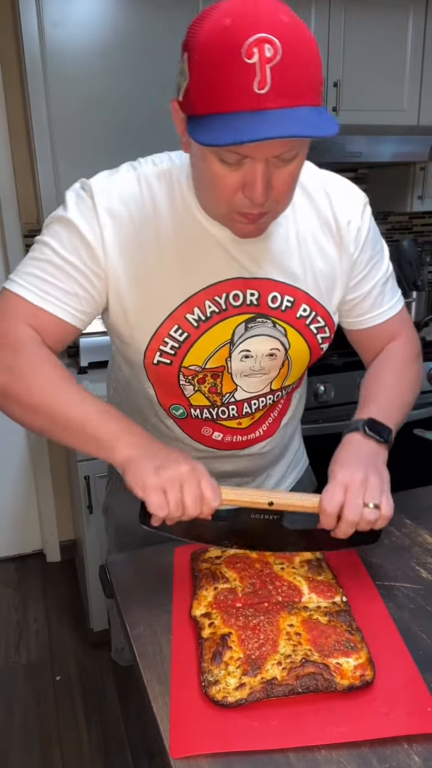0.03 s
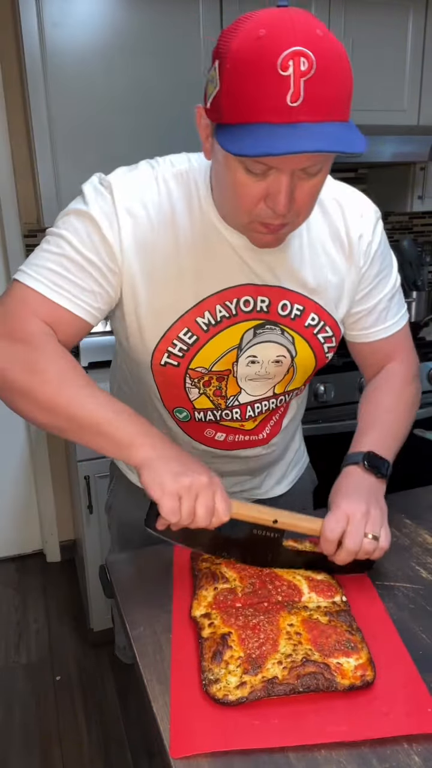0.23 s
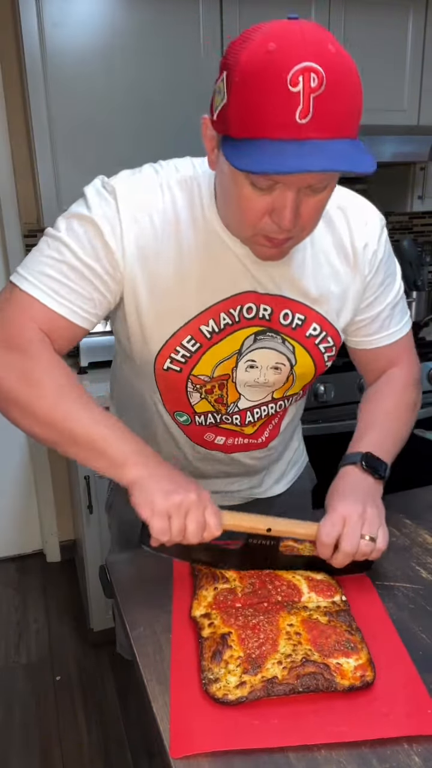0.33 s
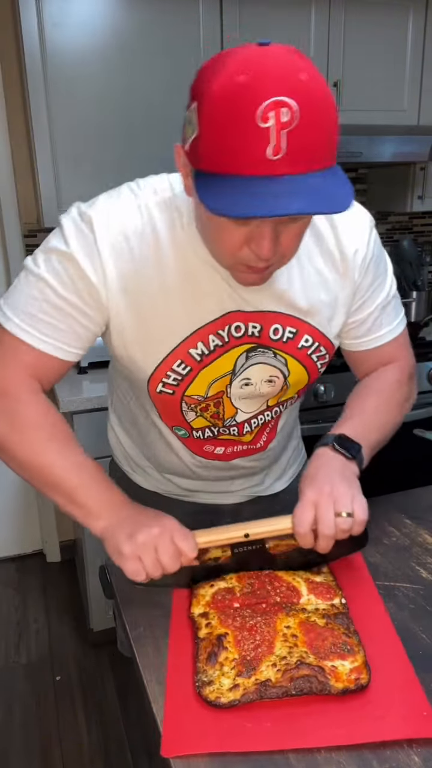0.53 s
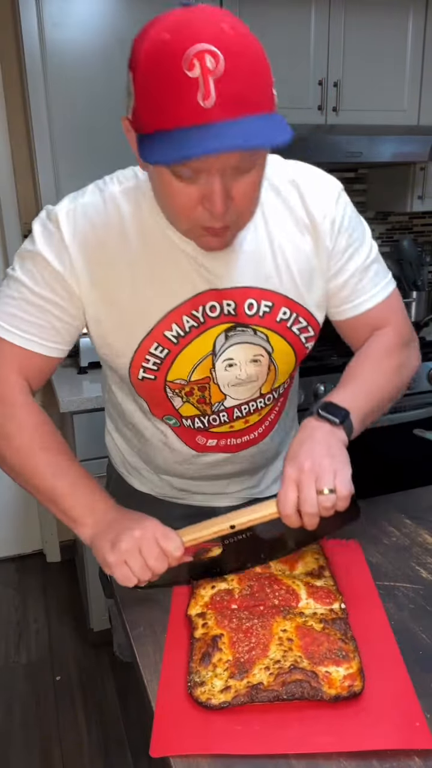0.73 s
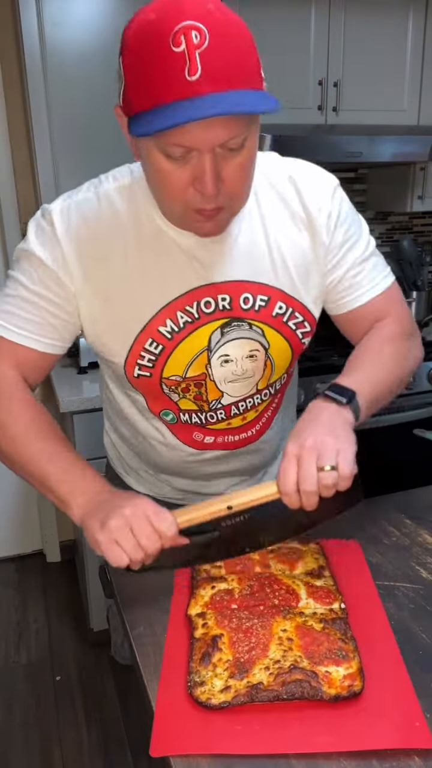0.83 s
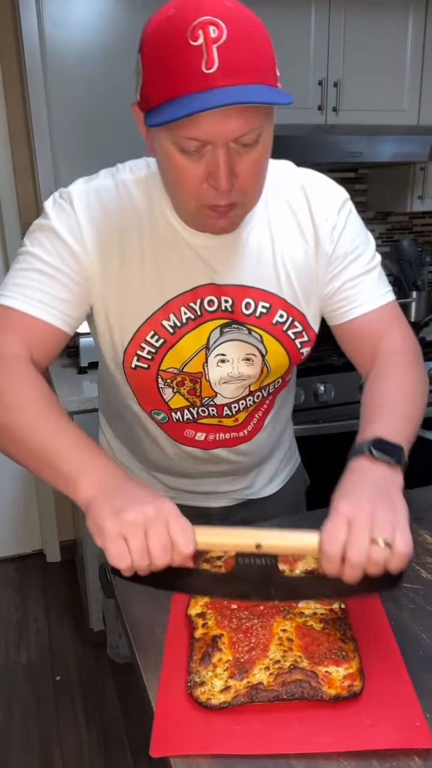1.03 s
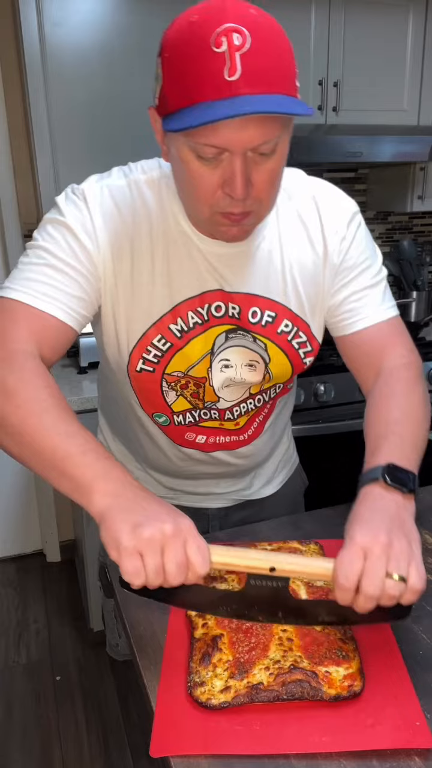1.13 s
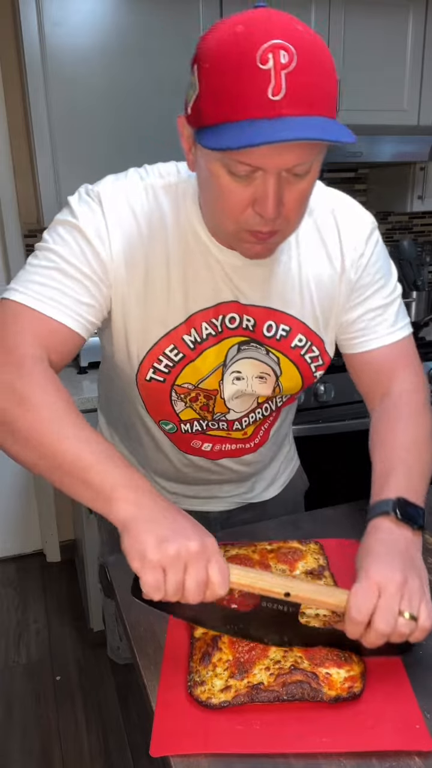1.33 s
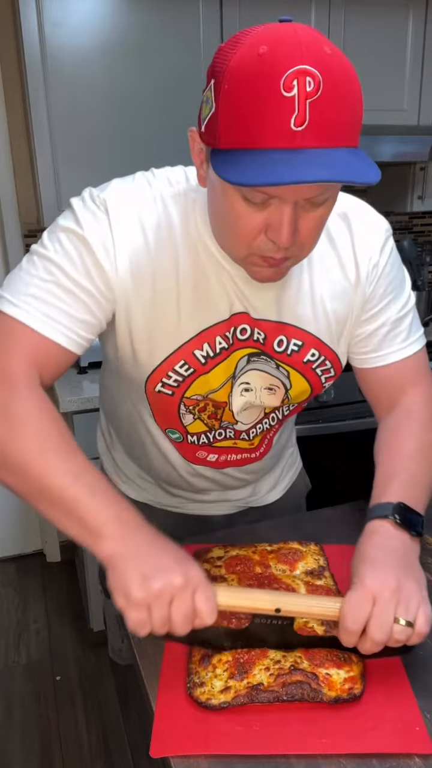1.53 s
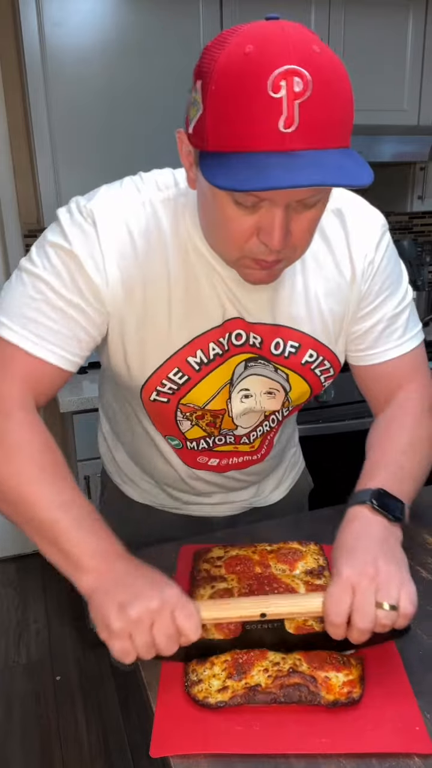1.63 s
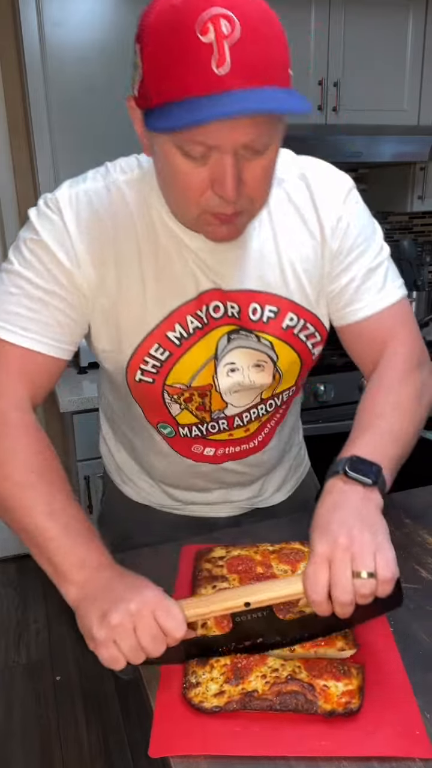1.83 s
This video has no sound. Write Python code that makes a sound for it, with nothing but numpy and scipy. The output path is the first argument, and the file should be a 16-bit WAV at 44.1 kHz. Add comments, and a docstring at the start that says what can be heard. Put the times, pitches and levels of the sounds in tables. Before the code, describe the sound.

A rocker knife crunches twice through crisp baked pizza crust, knocking on a board in a kitchen

```python
"""A steel rocker knife cuts a crisp pizza twice, on a board in a home kitchen where an appliance hums.
In the first cut the blade bites the crust, knocks onto the board, then rocks through: fracture grains
crackle, flakes snap as brief pings, and damped modes make the board groan and the blade ring faintly.
The blade then slides out with a faint swell of resonant noise. The second cut bites, knocks, crackles
and groans likewise, without the swell; a short low bump, one decaying cosine, falls near its end."""
import sys
import numpy as np
from scipy import signal
from scipy.fft import rfft, irfft, next_fast_len
from scipy.io import wavfile
from scipy.ndimage import map_coordinates

SR = 44100
rng = np.random.default_rng(int(sys.argv[2]) if len(sys.argv) > 2 else 0)


def wav_out(sig):
    """Save sig, one row per channel (or a flat mono array), as 16-bit PCM at SR to the path in sys.argv[1]."""
    wavfile.write(sys.argv[1], SR, np.round(np.clip(np.atleast_2d(sig).T, -1, 1) * 32767).astype(np.int16))


N = 83790  # length in samples

# modes of board and counter: [f/Hz, relative level/dB, t60/s]
BOARD_MODES = [(149.6, -15.5, 0.44), (178.7, -8.5, 0.15), (296, -10.5, 0.44), (325.2, -5.5, 0.26),
               (352.5, -10.5, 0.25), (423.6, -6.5, 0.26), (474.6, -6.5, 0.13), (506.7, -5, 0.15),
               (646, -10, 0.14), (691, -10, 0.3), (756, -11, 0.35), (977, -11, 0.066)]


def amp(db):
    """Amplitude ratio of a level in decibels."""
    return 10 ** (np.asarray(db) / 20)


def unit(x):
    """Normalization to rms 1, so that a level set afterwards is an rms level."""
    return x / np.sqrt(np.mean(x ** 2) + 1e-20)


def along(points, hz):
    """Interpolation of (f/Hz, value) points on a logarithmic frequency axis."""
    f, value = np.transpose(points)
    return np.interp(np.log(hz + 1), np.log(f + 1), value)


def filtered(x, response):
    """Linear filtering: the spectrum of x times a response of frequency."""
    length = next_fast_len(N + SR // 2)
    hz = np.fft.rfftfreq(length, 1 / SR)
    return irfft(rfft(x, length) * response(hz), length)[..., :N]


def coloured(x, spectrum):
    """Spectral shaping of x by (f/Hz, level/dB) points, normalized to rms 1."""
    return unit(filtered(x, lambda hz: amp(along(spectrum, hz))))


def since(s):
    """Elapsed time in seconds since the moment s, zero before it."""
    return np.maximum(np.arange(N) / SR - s, 0)


def dying(t, t60):
    """Exponential decay, by 60 dB in t60 seconds, that starts when t does."""
    return amp(-60 * t / t60) * (t > 0)


def ring(modes, t):
    """Modal superposition: damped sinusoids of alternating sign."""
    out = 0
    for k, (hz, db, t60) in enumerate(modes):
        out = out + (-1) ** k * amp(db) * dying(t, t60) * np.sin(2 * np.pi * hz * t)
    return out


def rung(x, modes):
    """Forced vibration: x convolved with a body's modal response, as strong as x."""
    return np.std(x) * unit(signal.fftconvolve(x, ring(modes, since(0)))[:N])


def grains(rate, spread_db):
    """Random impulses of either sign: tiny fractures, a few much larger than the rest."""
    size_db = spread_db * np.minimum(rng.exponential(size=N), 5)
    broken = rng.random(N) < rate / SR
    return broken * amp(size_db) * rng.choice([-1, 1], N)


def wobble(rate):
    """Random modulation: a smooth curve through rate random knots a second."""
    knots = rng.standard_normal(int(N * rate / SR) + 4)
    return map_coordinates(knots, [np.arange(N) * rate / SR])


def kitchen(x, wet_db, scatter_t60):
    """Impulse response in sum and difference: direct sound, scatter off the counter, reverberation."""
    # decay of the room: [f/Hz, t60/s]
    room_decay = [(100, 0.87), (500, 0.2), (2200, .5), (6000, 0.32), (12000, 0.18)]
    noise = rng.standard_normal((2, SR // 2))
    hz, t, bands = signal.stft(noise, SR, nperseg=256)
    fading = amp(-60 * t / along(room_decay, hz)[:, None])
    tail = signal.istft(bands * fading, SR, nperseg=256)[1]
    response = amp(wet_db) * tail / np.linalg.norm(tail[0])
    response[0, 0] += 1  # direct sound, in the sum only
    tail_t = np.arange(tail.shape[1]) / SR
    scatter = rng.standard_normal(tail.shape[1]) * dying(tail_t, scatter_t60)
    response[1] += scatter / np.linalg.norm(scatter)
    return signal.fftconvolve(x[None], response, axes=1)[:, :N]


def appliance():
    """Steady-state radiation: a hum of fixed partials over the broadband rush of the room."""
    # partials of the hum: [f/Hz, rms level/dB]
    partials = [(53.9, -56.5), (274, -64), (329.5, -62), (651.4, -68), (710.6, -72), (532.9, -75.5)]
    # colour of the rush: [f/Hz, relative level/dB]
    air_colour = [(25, -19), (45, 1.5), (200, -2), (450, -10), (700, -14), (1000, -22.5), (2000, -29.5),
                  (3200, -44.5), (6300, -37), (13000, -48.5)]
    air_db = -54.5
    hum = 0
    for hz, db in partials:
        cycles = hz * since(0) + rng.random()
        hum = hum + amp(db) * np.sqrt(2) * np.sin(2 * np.pi * cycles)
    rush = amp(air_db) * coloured(rng.standard_normal((2, N)), air_colour)
    return rush + hum * np.array([[1], [0]])  # hum in the sum channel only


def crust():
    """Brittle fracture under the rocking blade: grains crackle, shake the board and ring the steel."""
    # the two cuts: [t/s, fine crackle level/dB, coarse crunch level/dB, board's groan level/dB]
    cuts = [
        [(.152, -76, -79.5, -88), (.16, -54, -62.5, -47.5), (.188, -44, -46, -49), (.207, -44, -44.5, -32.5),
         (.275, -52, -45.5, -51), (.36, -56.5, -63, -45), (.368, -47, -42.5, -47), (.392, -38.5, -40, -40),
         (.403, -41, -35, -31), (.485, -40, -42.5, -38), (.53, -55, -48, -42), (.552, -43, -42.5, -43.5),
         (.62, -68, -66, -60), (.755, -74, -70, -56), (.772, -61, -55.5, -60), (.85, -75, -69, -74)],
        [(1.215, -85, -93, -83), (1.235, -64.5, -80, -72), (1.318, -54, -52.5, -67), (1.327, -37.5, -57, -51),
         (1.355, -61, -44, -35), (1.445, -56.5, -62, -45.5), (1.492, -43.5, -44, -43), (1.565, -31, -32.5, -27),
         (1.6, -40, -36, -32.5), (1.635, -36.5, -41, -34), (1.685, -58.5, -63, -48),
         (1.732, -46.5, -47.5, -37.5), (1.785, -66, -71, -59), (1.895, -76, -83, -73)],
    ]
    # tilt of the groan in dB per octave: the far cut groans deeper than the near one
    groan_tilts_db = [-1.6, 2.5]
    # colours of the three layers: [f/Hz, relative level/dB]
    crackle_colour = [(1500, 1.5), (2800, -3), (4000, -0.5), (5800, 1), (7500, -3), (9200, -1.5),
                      (11500, -3.5), (12300, -9), (15500, -24)]
    crunch_colour = [(500, -44), (950, 8.5), (1550, 3.5), (2050, 6), (2600, 0.5), (3600, -6), (6000, -41)]
    groan_colour = [(31, -34.5), (41, -8), (82, 2.5), (120, -11.5), (165, -2.5), (230, -12.5), (305, 4.5),
                    (390, -4), (510, 4.5), (610, -5.5), (710, 0), (850, -16.5), (1500, -45)]
    # modes of the blade: [f/Hz, relative level/dB, t60/s]
    blade_modes = [(1221, -0.5, 0.16), (1956, -10, 0.2), (2165, 1, 0.22), (2205, -3.5, 0.31),
                   (2700, 6, 0.31), (2717, -10, 0.49)]
    crackle_rate, crunch_rate = 2700, 1500  # fractures a second
    crackle_spread_db, crunch_spread_db = 2.5, 2.2
    spurt_rate, spurt_db = 110, 1.5  # the crust gives way in spurts: knots a second, depth
    blade_db, board_db = -12, -18  # blade's ring against the crunch, board's against the groan
    t, out = since(0), 0
    for cut, tilt_db in zip(cuts, groan_tilts_db):
        s, *levels = np.transpose(cut)
        spurts = spurt_db * wobble(spurt_rate)
        fine, coarse, low = [amp(np.interp(t, s, db, left=-120, right=-120) + spurts) for db in levels]
        crackle = fine * coloured(grains(crackle_rate, crackle_spread_db), crackle_colour)
        # crunch and groan share the same fractures
        breaks = grains(crunch_rate, crunch_spread_db)
        crunch = coarse * coloured(breaks, crunch_colour)
        tilted = [(hz, db + tilt_db * np.log2(hz)) for hz, db in groan_colour]
        groan = low * coloured(breaks, tilted)
        blade = amp(blade_db) * rung(crunch, blade_modes)
        board = amp(board_db) * rung(groan, BOARD_MODES)
        out = out + kitchen(crackle + crunch + groan + blade + board, wet_db=-6, scatter_t60=0.055)
    return out


def snaps():
    """Impulsive release as larger flakes break: a ping of a few cycles inside a wider, short crack."""
    # single flakes: [t/s, level/dB, f/Hz]
    flakes = [(0.1942, -20, 6700), (.2022, -21.5, 8500), (.2027, -22, 3500), (.278, -32, 9200),
              (.2894, -31, 10100), (0.4778, -19.5, 5600), (.5412, -19.5, 4300), (0.543, -25, 8300),
              (.649, -29, 4700), (0.765, -43.5, 4730), (0.7742, -35.5, 9700), (.792, -44, 6350),
              (1.227, -39.5, 6200), (1.2959, -31, 6300), (1.3249, -29, 4900), (1.332, -38, 5660),
              (1.339, -29, 6050), (1.404, -39, 8650), (1.651, -22.5, 6050), (1.7047, -18, 5830)]
    ping_db, ping_t60 = 1, 0.0027  # level against the flake's, decay in s
    crack_db, crack_t60, crack_octaves = -8.5, 0.0067, 0.68  # the same, then width of its band
    out = 0
    for s, db, pitch_hz in flakes:
        t = since(s)
        ping = amp(ping_db) * dying(t, ping_t60) * np.sin(2 * np.pi * pitch_hz * t)
        band = lambda hz: np.exp(-(np.log2((hz + 1) / pitch_hz) / crack_octaves) ** 2)
        noise = unit(filtered(rng.standard_normal(N), band))
        crack = amp(crack_db) * noise * dying(t, crack_t60)
        out = out + amp(db) * (ping + crack)
    return kitchen(out, wet_db=-8.5, scatter_t60=0.0067)


def knocks():
    """Impact excitation: the blade splits the bottom crust and clacks; board and counter ring on."""
    # contacts: [t/s, level of clack and ring/dB, f of the clack/Hz, dull thud level/dB, split level/dB]
    contacts = [(0.202, -15.5, 715, -13.5, -26), (.4, -25, 487, -28, -36),
                (0.6485, -48.5, 687, -44.5, -44.5), (1.3396, -18, 668, -30, -37),
                (1.624, -33, 720, -33, -44), (1.87, -47, 590, -42, -60)]
    # colours of thud and splitting crust: [f/Hz, relative level/dB]
    thud_colour = [(30, -26), (80, -6.5), (200, 2.5), (700, 2.5), (1100, -7.5), (3000, -64)]
    split_colour = [(600, -5), (2000, -2.5), (3600, -7), (5500, -14.5), (10000, -35), (14000, -55)]
    clack_db, clack_t60 = 4.5, 0.053  # level against the contact's, decay in s
    board_db = -1  # likewise against the contact's level
    thud_t60, thud_attack_s = 0.27, 0.0013
    split_rate, split_t60 = 7000, 0.16  # fractures a second as the bottom crust gives, decay in s
    cutoff_over_pitch = 1.33
    out = 0
    for s, db, pitch_hz, thud_db, split_db in contacts:
        t = since(s)
        clack = amp(clack_db) * dying(t, clack_t60) * np.sin(2 * np.pi * pitch_hz * t)
        board = amp(board_db) * ring(BOARD_MODES, t)
        attack = 1 - np.exp(-t / thud_attack_s)
        thud = coloured(rng.standard_normal(N), thud_colour) * dying(t, thud_t60) * attack
        # a low-pass above the clack's pitch softens all but the split
        cutoff_hz = min(cutoff_over_pitch * pitch_hz, SR / 4)
        soft = signal.butter(2, cutoff_hz, fs=SR, output="sos")
        body = signal.sosfilt(soft, amp(db) * (clack + board) + amp(thud_db) * thud)
        split = coloured(grains(split_rate, spread_db=1), split_colour) * dying(t, split_t60)
        out = out + body + amp(split_db) * split
    return kitchen(out, wet_db=-15, scatter_t60=0.039)


def scrape():
    """Friction noise through resonances: the blade lifts out and crust brushes the steel in a swell."""
    # resonances of the brushed steel: [f/Hz]
    resonances_hz = [2120, 3400, 4500]
    centre_s, half_s, level_db = 0.91, 0.12, -70
    width_hz = 170  # half-width of each resonance
    swell = np.exp(-((since(0) - centre_s) / half_s) ** 2)
    steel = lambda f: sum(1 / (1 + ((f - hz) / width_hz) ** 2) for hz in resonances_hz)
    return amp(level_db) * swell * unit(filtered(rng.standard_normal((2, N)), steel))


def bump():
    """Damped oscillation from its crest: a short low bump with a hard start, in the sum channel."""
    start_s, pitch_hz, level_db, t60 = 1.8895, 218, -21, 0.12
    t = since(start_s)
    tone = amp(level_db) * dying(t, t60) * np.cos(2 * np.pi * pitch_hz * t)
    return tone * np.array([[1], [0]])


def scene():
    """Stereo coherence at two close microphones: alike in the bass, opposed in the top treble."""
    # difference between the microphones over their sum: [f/Hz, gain/dB]
    width = [(60, -50), (180, -18), (350, -15.5), (700, -8.5), (1400, -2), (4500, -5.5), (6400, -22),
             (8500, -3), (11000, 4), (12800, 21.5)]
    sources = appliance() + crust() + snaps() + knocks() + scrape() + bump()

    def share(hz):
        """Constant-power division between sum and difference by an angle."""
        angle = np.arctan(amp(along(width, hz)))
        return np.array([np.cos(angle), np.sin(angle)])

    mid, side = filtered(sources, share)
    return np.array([mid + side, mid - side])


def record(dry):
    """Band limitation: the recorder drops the deepest bass and keeps nothing above its limit."""
    low_cut_hz, top_hz = 33, 16300
    high_pass = signal.butter(4, low_cut_hz, "high", fs=SR, output="sos")
    thinned = signal.sosfilt(high_pass, dry)
    return filtered(thinned, lambda hz: hz < top_hz)


dry = scene()
out = record(dry)
wav_out(out)
```